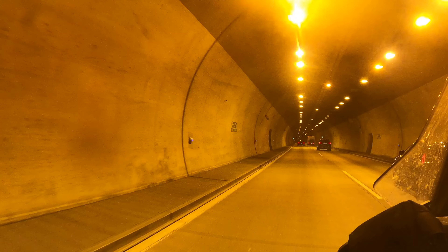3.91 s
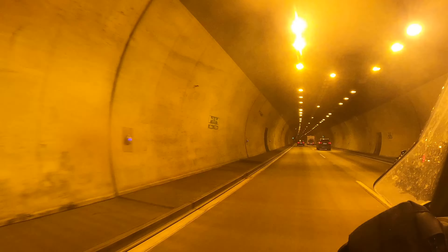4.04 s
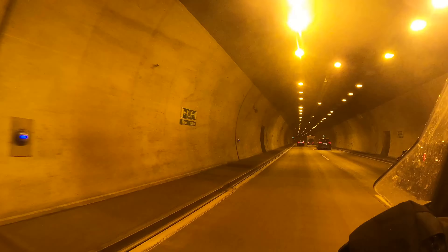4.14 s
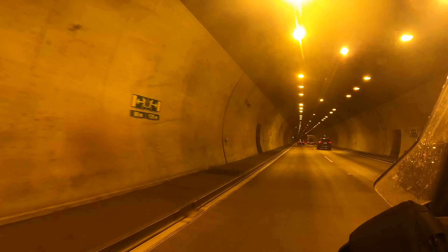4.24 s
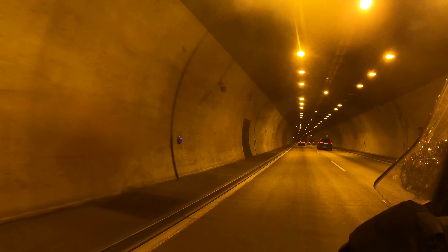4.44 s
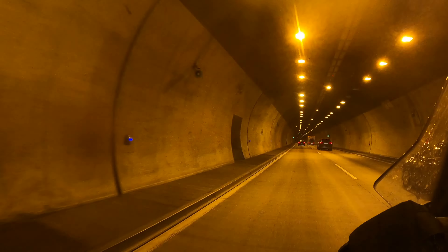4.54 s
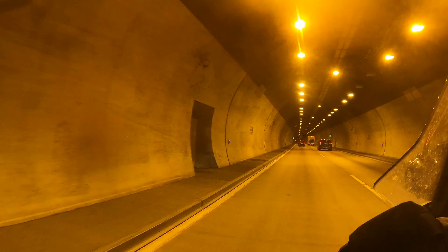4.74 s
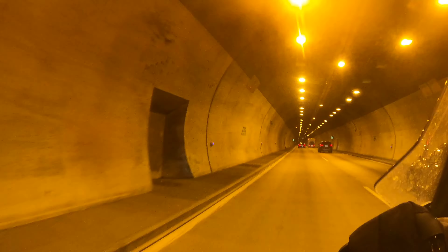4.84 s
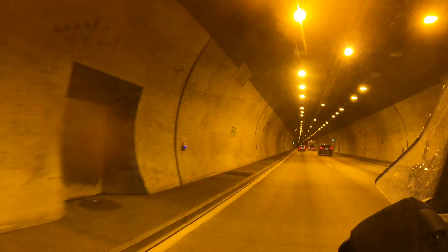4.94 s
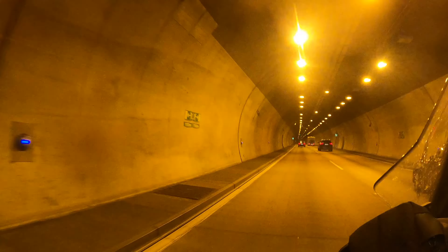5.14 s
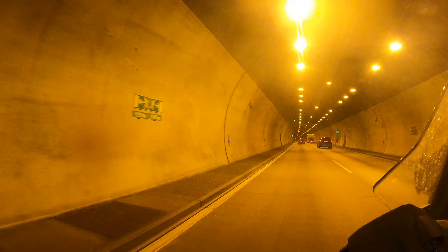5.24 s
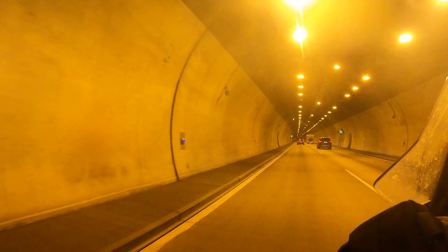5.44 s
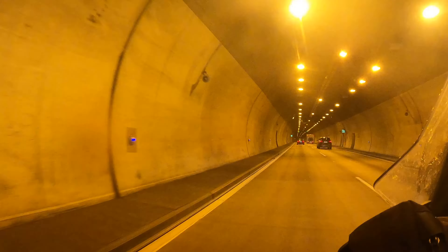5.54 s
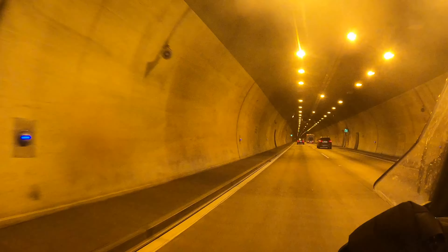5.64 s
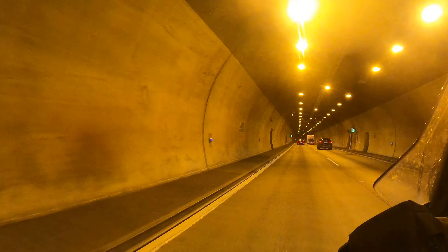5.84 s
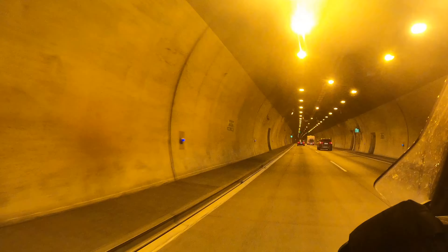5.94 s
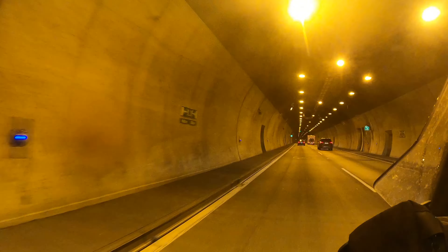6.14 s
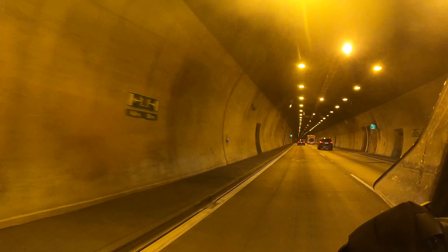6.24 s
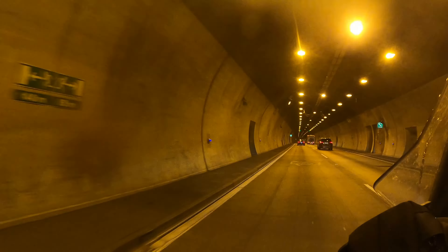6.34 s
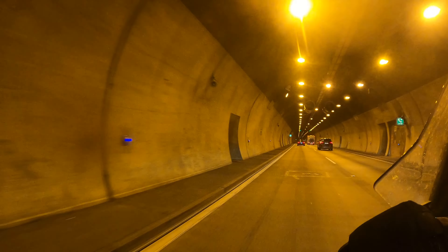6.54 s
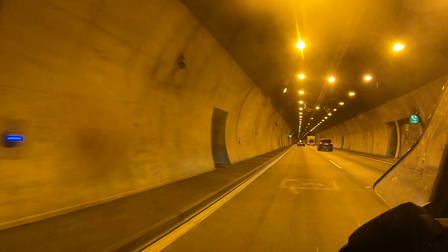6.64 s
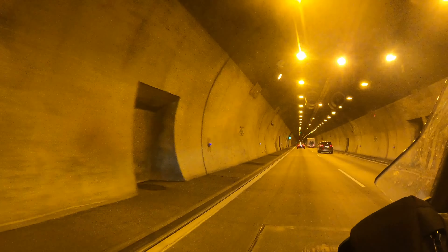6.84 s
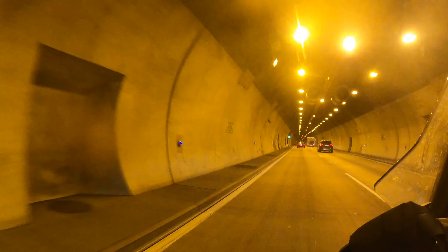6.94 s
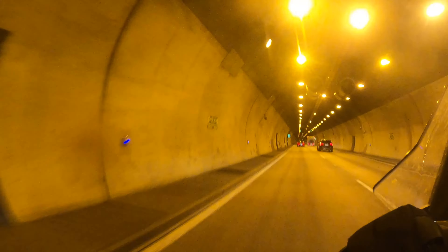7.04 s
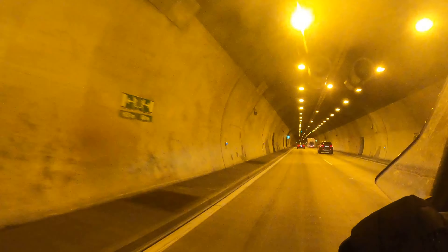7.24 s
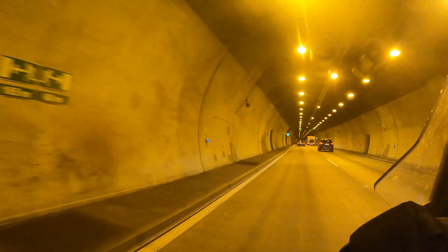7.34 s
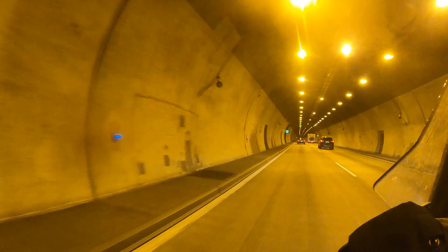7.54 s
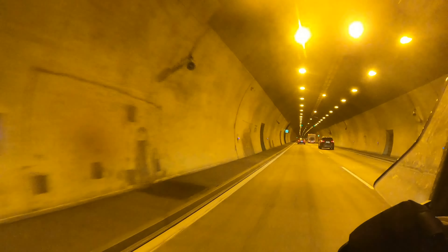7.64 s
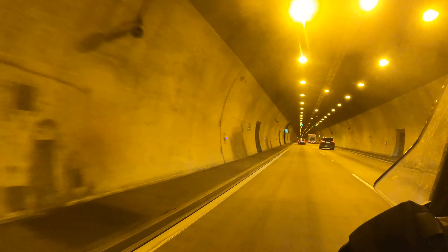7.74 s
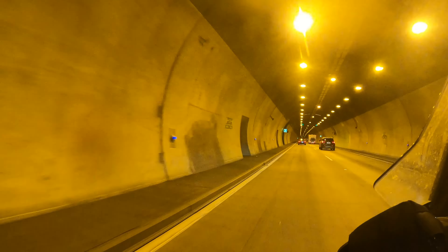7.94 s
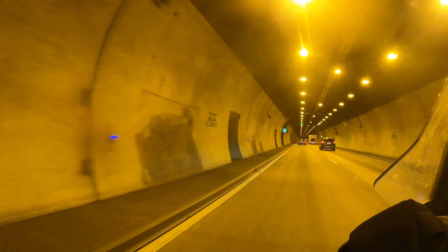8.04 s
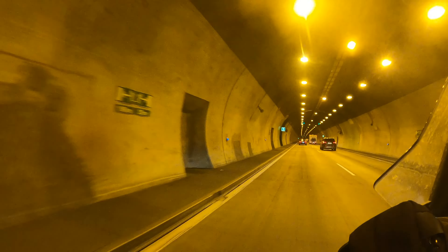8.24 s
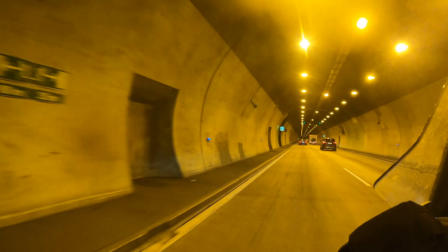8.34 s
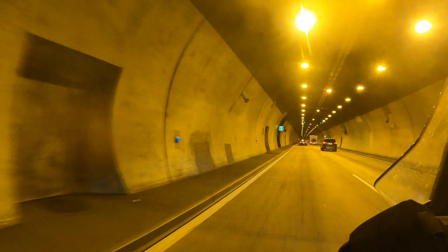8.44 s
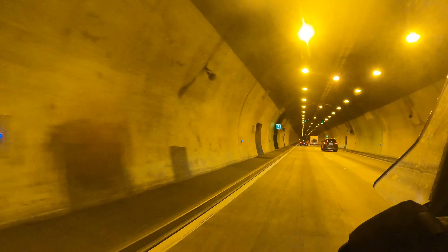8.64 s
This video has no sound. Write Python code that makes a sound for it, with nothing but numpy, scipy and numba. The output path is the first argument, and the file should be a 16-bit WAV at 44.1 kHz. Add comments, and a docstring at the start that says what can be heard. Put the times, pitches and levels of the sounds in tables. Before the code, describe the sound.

Low wind rumble and rushing tyre noise surround a microphone riding on a large motorcycle in a road tunnel. The engine holds a nearly constant low note, which the walls turn into a growing, pulsing boom. After a short soft hoot, the exhaust swells briefly twice, once more around the middle, and twice again later. A faint high hiss and a tyre hum sit within the continuous roar.

```python
"""Twin motorcycle in a road tunnel

The microphone rides on a big twin as it cruises through a concrete tube. Wind buffets the microphone
and tyre roar fills the tunnel from its mouth on, with one brief hoot and a faint high hiss.
Close by, the exhaust barks once a firing, louder at five twists of the throttle; the walls
throw the bark back, and the tube booms on the lowest engine orders."""
import sys
import numpy as np
from scipy import signal
from scipy.fft import rfft, irfft, next_fast_len
from scipy.io import wavfile
from scipy.ndimage import uniform_filter1d, minimum_filter1d
from numba import njit

SR = 44100
rng = np.random.default_rng(int(sys.argv[2]) if len(sys.argv) > 2 else 0)


def to_wav(s):
    """Save 16-bit WAV."""
    ch = np.atleast_2d(s).T  # columns
    pcm = np.round(np.clip(ch, -1, 1) * 32767)  # PCM
    wavfile.write(sys.argv[1], SR, pcm.astype(np.int16))


N = 383669
T = np.arange(N) / SR

# Road and air noise at the bike: (time [s], tyre gain [dB], tyre treble lift [dB], wind gain [dB])
ROAD_AND_AIR = [(0, -30, 12, -14), (.06, -31.5, 10.5, -9.5), (.09, -37.5, 10, -14),
                (.14, -31.5, 10.5, -13.5), (.22, -36.5, 10.5, -12), (.3, -33, 9, -15),
                (.36, -32, 10, -17.5), (.46, -30.5, 11, -16), (.6, -30.5, 10.5, -17), (.7, -28, 11.5, -17),
                (.78, -25.5, 7.5, -17.5), (.88, -25.5, 6.5, -17.5), (1.05, -23.5, 6.5, -20),
                (1.4, -23, 4.5, -16), (1.75, -23.5, 4.5, -16.5), (2.05, -21.5, 4.5, -19),
                (2.55, -23, 3.5, -15), (2.75, -24, 4, -17.5), (3.05, -25, 3.5, -16),
                (3.5, -23.5, 3.5, -14.5), (3.9, -24, 2, -14.5), (4.3, -24.5, 3, -13.5),
                (4.55, -21.5, 1.5, -17), (4.86, -23.5, 2.5, -15), (4.94, -25, 2, -18),
                (5.12, -25, 2.5, -17.5), (5.4, -21.5, 0, -15), (6.05, -22.5, 1.5, -16),
                (6.6, -21, 1, -15.5), (6.9, -22.5, 1.5, -15), (7.2, -23.5, 0, -17.5),
                (7.5, -23.5, 0.5, -16), (8.0, -23, 0, -15), (8.35, -23, 2, -13.5), (8.7, -20, -2, -16)]


def undb(db):
    """Decibels to amplitude."""
    return 10 ** (np.asarray(db) / 20)


def level(x, db):
    """Scale to an rms level."""
    return x * undb(db) / np.sqrt(np.mean(x ** 2))


def curves(table):
    """Columns of a table, joined by straight lines in time."""
    times, *columns = np.transpose(table)
    return [np.interp(T, times, column) for column in columns]


@njit
def bandpass(x, hz, width_hz):
    """State-variable resonance, gain 1 at the centre."""
    y, band_state, low_state = np.empty(len(x)), 0., 0.
    g, damping = np.tan(np.pi * hz / SR), width_hz / hz
    for i in range(len(x)):
        band = (band_state + g * (x[i] - low_state)) / (1 + g * (g + damping))
        band_state = 2 * band - band_state
        low_state += 2 * g * band
        y[i] = damping * band
    return y


def wander(rate):
    """Random values held for 1 / rate seconds and smoothed twice; spread near 1."""
    hold = int(SR / rate)
    steps = np.repeat(rng.standard_normal(N // hold + 1), hold)
    return 1.3 * uniform_filter1d(uniform_filter1d(steps, hold), hold)[:N]


def rushing_noise(spectrum, swell_db, flicker_db, flicker_rate, treble_db=0, bass_db=0, bright_db=0):
    """Coloured noise in half-octave bands that swell together and flicker alone."""
    hz, db = np.transpose(spectrum)
    n = next_fast_len(N, True)
    freqs = np.maximum(np.arange(n // 2 + 1) * SR / n, 1)
    colour = undb(np.interp(np.log(freqs), np.log(hz), db, -150, -150))
    noise = rfft(rng.standard_normal(n)) * colour
    out = 0
    for octave in np.arange(4, 14.5, .5):  # band centre: 2 ** octave Hz
        share = np.cos(np.pi * np.clip(np.log2(freqs) - octave, -.5, .5)) ** 2
        tilt_db = bass_db * np.interp(octave, [6.5, 7.5], [1, 0])
        tilt_db += treble_db * np.interp(octave, [10, 10.5, 11, 12, 12.5, 13.5], [0, .6, .45, 1, 1, .3])
        tilt_db += bright_db * (10.5 <= octave <= 11)
        out += irfft(noise * share, n)[:N] * undb(tilt_db + swell_db + flicker_db * wander(flicker_rate))
    return out / np.sqrt(np.mean(colour ** 2))


def hiss():
    """A faint high hiss that grows about three seconds in and stays."""
    band = rng.standard_normal(N)
    for _ in range(2):
        band = bandpass(band, hz=12500., width_hz=6000.)
    return level(band, db=-78) * np.clip((T - 3.1) / .7 + .5, .05, 1)


def hoot():
    """A brief soft tone that swells and fades as its pitch falls."""
    start_s, length_s, from_hz, to_hz = 2.38, .15, 685, 655
    progress = np.clip((T - start_s) / length_s, 0, 1)
    hz = from_hz + (to_hz - from_hz) * progress
    return undb(-23.5) * np.sin(np.pi * progress) * np.sin(2 * np.pi * np.cumsum(hz) / SR)


def tread_hum():
    """The tread blocks hum in a narrow band inside the roar."""
    # Strength of the hum: (time [s], level [dB])
    hum_levels = [(0, -52), (1, -38), (3, -42), (5, -42), (5.4, -35.5), (6.5, -34.5), (7.2, -36),
                  (8.7, -34)]
    band = rng.standard_normal(N)
    for _ in range(3):
        band = bandpass(band, hz=930., width_hz=260.)
    return level(band, 0) * undb(curves(hum_levels)[0])


def tyre_roar():
    """Tyres on the road fill the tunnel, louder and duller past its mouth."""
    # Colour of the roar: (frequency [Hz], relative density [dB])
    spectrum = [(200, -17), (320, -10.5), (450, -1.5), (650, -1.5), (800, 0.5), (850, 1), (900, 2),
                (970, -1), (1030, 0), (1100, -2.5), (1400, -7.5), (1750, -9.5), (2000, -12.5),
                (2600, -18.5), (3800, -24.5), (5500, -34.5), (7500, -45), (10000, -53.5), (11000, -62),
                (12000, -67), (13500, -75), (15500, -91)]
    # Its upper middle, an octave around 1.8 kHz: (time [s], lift [dB])
    brightness = [(0, 0), (2.5, -0.5), (3.5, 0), (4.3, 1.5), (4.6, 1.5), (4.88, 0.5), (4.95, -0.5),
                  (5.6, 0), (6.5, 1), (7.5, .5), (8.7, 1)]
    gain_db, treble_db, _ = curves(ROAD_AND_AIR)
    return undb(gain_db) * rushing_noise(spectrum, swell_db=.8 * wander(24), flicker_db=.4,
                                        flicker_rate=14, treble_db=treble_db,
                                        bright_db=curves(brightness)[0])


def wind_buffet():
    """The airstream beats right on the microphone in a low rumble."""
    # Colour of the wind: (frequency [Hz], relative density [dB])
    spectrum = [(18, -8), (28, 10.5), (40, 12), (50, 5.5), (65, 13), (90, 11), (150, 8), (270, 3.5),
                (450, -5), (800, -20)]
    # Its bass: (time [s], lift [dB])
    rumble = [(0, -1.5), (.8, 0.5), (1.8, 0.5), (2.7, -2), (3.6, -3.5), (4.3, -1), (5, -3), (5.7, -3),
              (6.4, -2), (7.2, -1.5), (8, -2), (8.7, -5)]
    _, _, gain_db = curves(ROAD_AND_AIR)
    return undb(gain_db) * rushing_noise(spectrum, swell_db=.6 * wander(5), flicker_db=.6,
                                        flicker_rate=8, bass_db=curves(rumble)[0])


def tunnel_reverb(exhaust, t60_s=.35, gain_db=-10):
    """The concrete all around smears each bark into a dense growl."""
    t = T[:int(t60_s * SR)]
    tail = rng.standard_normal(len(t)) * undb(-60 * t / t60_s) * np.minimum(t / .006, 1)
    return undb(gain_db) * signal.oaconvolve(exhaust, tail / np.sqrt(np.sum(tail ** 2)))[:N]


def wall_echoes(exhaust):
    """Walls that come nearer or fall behind return the note sharper or flatter."""
    # Paths off walls ahead and behind: (starting delay [s], closing speed [m/s], gain [dB])
    paths = [(.021, .05, -13), (.25, 6.0, -11), (.12, -5.0, -12)]
    return sum(undb(db) * np.interp(T - delay + T * speed / 343, T, exhaust)
               for delay, speed, db in paths)


def tunnel_boom(cycles, bark_db):
    """Low orders: nearly in step with the firings on open throttle, else scattered by the tube's paths."""
    # Steady drone, orders 1 to 9 of the firing rate: (base level [dB])
    drone = (-20, -22, -23.5, -28.5, -38.5, -35.5, -37, -37.5, -39.5)
    # The drone grows as the tunnel closes in: (time [s], gain [dB])
    enclosure = [(0, -14), (1.2, -5), (2.6, -3.5), (8.7, 0)]
    # Its strongest throbs: (centre [s], length [s], engine order, peak level [dB])
    throbs = [(0.322, 0.43, 1, -24.5), (1.454, 0.68, 1, -22), (1.65, 0.58, 3, -22.5), (1.9, 0.17, 1, -20),
              (2.074, 0.2, 3, -18), (2.172, 0.15, 2, -19.5), (2.465, 0.95, 6, -26), (1.884, 0.39, 9, -35.5),
              (2.854, 0.34, 9, -27.5), (2.63, .25, 3, -17.5), (2.75, 0.7, 2, -19), (3.623, 0.23, 2, -21),
              (4.42, 0.27, 2, -22.5), (7.0, 0.49, 2, -23), (6.97, .12, 3, -18.5), (2.868, 0.16, 4, -18),
              (2.953, 0.51, 1, -15.5), (3.091, 0.28, 4, -14.5), (3.403, 0.64, 1, -15.5),
              (3.332, 0.31, 4, -20.5), (3.528, 0.18, 4, -18.5), (3.55, 0.13, 3, -13.5),
              (3.737, 0.3, 4, -18.5), (3.966, 0.32, 4, -19.5), (3.86, 0.37, 1, -15), (4.039, 0.13, 2, -16),
              (4.22, 0.4, 1, -16.5), (4.131, 0.16, 4, -22.5), (4.317, 0.16, 4, -21),
              (4.642, 0.23, 4, -20.5), (4.657, 0.39, 1, -15), (4.78, 0.17, 2, -18), (5.007, 0.47, 1, -11.5),
              (5.194, 0.29, 4, -20), (5.389, 0.077, 3, -12.5), (5.549, 0.92, 2, -18.5),
              (5.74, 0.15, 3, -13), (6.1, .35, 1, -16), (6.154, 0.49, 3, -21), (6.448, 0.83, 2, -17.5),
              (6.823, 0.32, 1, -11.5), (5.632, 0.42, 4, -23.5), (6.391, 0.42, 4, -24),
              (6.854, 0.24, 4, -18), (6.922, 0.15, 3, -18), (7.118, 0.16, 3, -14.5),
              (7.252, 0.56, 4, -21.5), (7.352, 0.27, 3, -15.5), (7.369, 0.95, 1, -16.5),
              (7.582, 0.25, 2, -22), (7.705, 0.12, 3, -14.5), (7.69, 0.28, 4, -22), (7.95, 1, 3, -19.5),
              (8.166, 0.31, 4, -21), (8.541, 0.14, 3, -13)]
    shut_db, open_db = -27, -21  # bark at a shut and an open throttle
    lead_rad = .6  # the orders lead the push of gas: pressure climbs to each firing, then drops
    scatter = np.interp(bark_db, (shut_db, open_db), [1, .4])
    out = 0
    for order, db in enumerate(drone, 1):
        waver_rad = scatter * (2.2 * wander(1) + .18 * (1 + order / 2) * wander(10))
        fade_db = 1.3 * wander(9)  # paths through the tube add or cancel
        size = undb(db + curves(enclosure)[0] + fade_db)
        for centre, length, throb_order, peak_db in throbs:
            if throb_order == order:
                span = slice(max(int((centre - length / 2) * SR), 0), int((centre + length / 2) * SR))
                throb = undb(peak_db) * np.cos(np.pi * (T[span] - centre) / length)
                size[span] = np.maximum(size[span], throb)
        flicker = undb(.8 * wander(14))
        out += np.sqrt(2) * size * flicker * np.cos(2 * np.pi * order * cycles + lead_rad + waver_rad)
    return out


def throttle(attack_s=.05, release_s=.06):
    """Level of the bark in dB: cruising, lifted by each twist of the grip."""
    # Bark while cruising: (time [s], level [dB])
    cruise = [(0, -29), (.6, -31), (1.7, -28.5), (2.3, -33), (3.9, -26.5), (5.5, -27), (6.7, -36.5),
              (8.7, -32.5)]
    # Twists of the throttle: (start [s], hold [s], bark level [dB])
    twists = [(2.62, .1, -17.5), (2.88, .15, -20), (4.87, .2, -18), (6.75, .12, -19), (7.05, .16, -19)]
    cruise_db, = curves(cruise)
    bark_db = cruise_db
    for start, hold, top_db in twists:
        opening = np.interp(T - start, np.cumsum([0, attack_s, hold, release_s]), [0, 1, 1, 0])
        bark_db = bark_db + (top_db - cruise_db) * opening
    return bark_db


def exhaust_bark(cycles, bark_db):
    """Close by, each firing is a soft, uneven push of gas with a rasp behind it; both ring the pipe."""
    # Modes of the pipe: (frequency [Hz], width [Hz], gain [dB])
    modes = [(297, 42, -1), (357, 38, 2), (417, 42, -2), (520, 70, -12)]
    push_s, uneven_db, jitter_s, rasp_db = .0027, 2.0, .00025, -10
    push = np.hanning(int(push_s * SR)) ** 2

    def ring_pipe(drive):
        gas = np.convolve(drive, push, "same")
        return sum(undb(db) * bandpass(gas, float(hz), float(width)) for hz, width, db in modes)

    firings = np.flatnonzero(np.diff(np.floor(cycles)))
    size, late = rng.standard_normal((N // 500, 2))[:len(firings)].T
    onsets = np.clip(firings + (jitter_s * SR * late).astype(int), 0, N - 1)
    pulses = np.zeros(N)
    pulses[onsets] = undb(uneven_db * size)
    rasp = np.exp(-(cycles % 1) / .4) * rng.standard_normal(N)
    return (level(ring_pipe(pulses), 0) + level(ring_pipe(rasp), rasp_db)) * undb(bark_db)


def scene():
    """Exhaust, tunnel, road and air meet at one microphone on the bike."""
    # Pace of the engine: (time [s], firing rate [Hz])
    firing_rate = [(0, 58.54), (1.4, 58.14), (2.2, 57.9), (2.6, 56.97), (2.7, 58.76), (3.2, 58.96),
                   (3.6, 61.15), (3.85, 60.1), (4.05, 58.85), (4.75, 58.74), (5.0, 59.95), (5.25, 59.4),
                   (6.55, 59.28), (7.0, 59.16), (7.2, 60.54), (7.55, 59.93), (8.2, 61.55), (8.7, 61.1)]
    cycles = np.cumsum(curves(firing_rate)[0]) / SR  # one cycle a firing
    bark_db = throttle()
    exhaust = exhaust_bark(cycles, bark_db)
    rush = tyre_roar() + wind_buffet()
    tunnel = wall_echoes(exhaust) + tunnel_reverb(exhaust) + tunnel_boom(cycles, bark_db)
    return (exhaust + tunnel + rush + hoot() + hiss() + tread_hum())[None]


def record(dry):
    """A limiter looks ahead and holds the peaks down; the top is cut."""
    ceiling, hold_s, top_hz = .83, .02, 15140
    hold = int(hold_s * SR)
    needed_gain = ceiling / np.maximum(np.abs(dry), ceiling)
    gain = uniform_filter1d(minimum_filter1d(needed_gain, hold), hold)
    fade_in = np.minimum(T / .005, 1)
    lowpass = signal.ellip(8, .2, 70, top_hz, fs=SR, output="sos")
    return signal.sosfilt(lowpass, dry * gain * fade_in)


dry = scene()
out = record(dry)
to_wav(out)
```